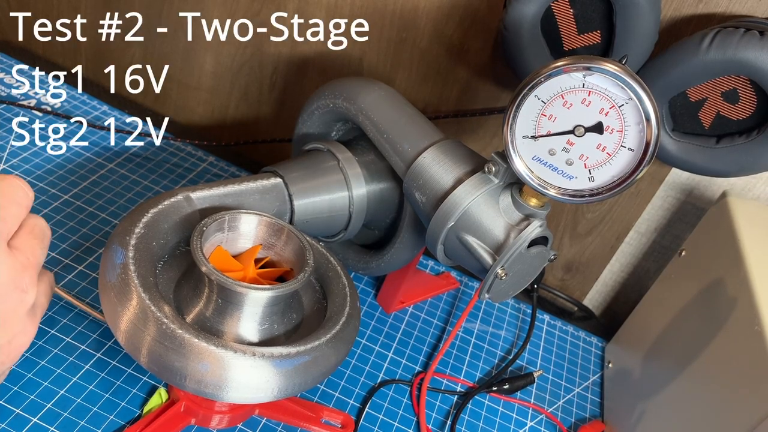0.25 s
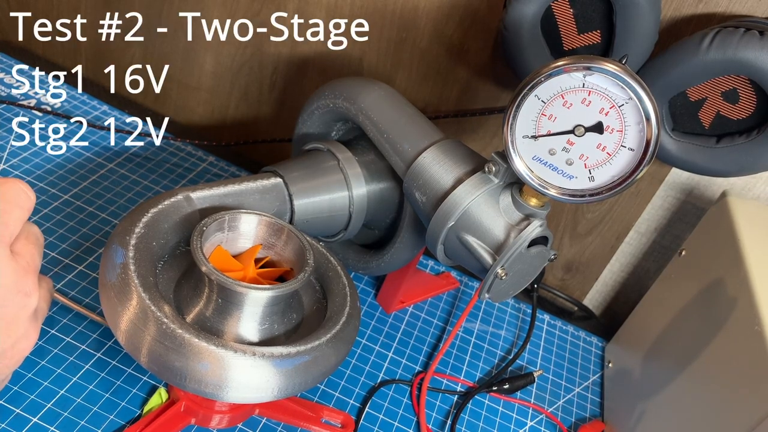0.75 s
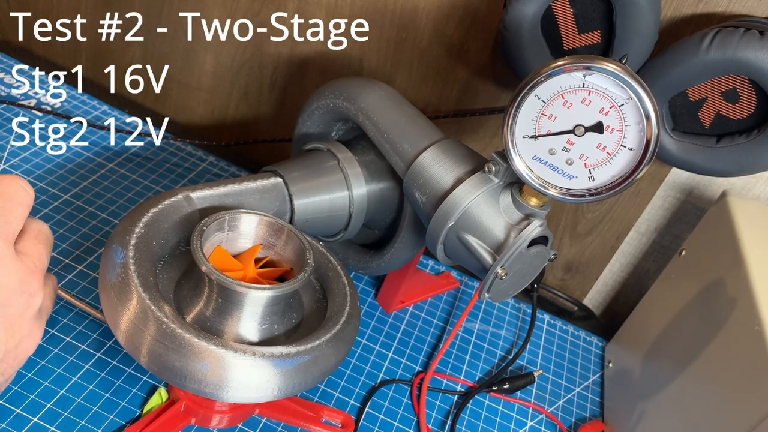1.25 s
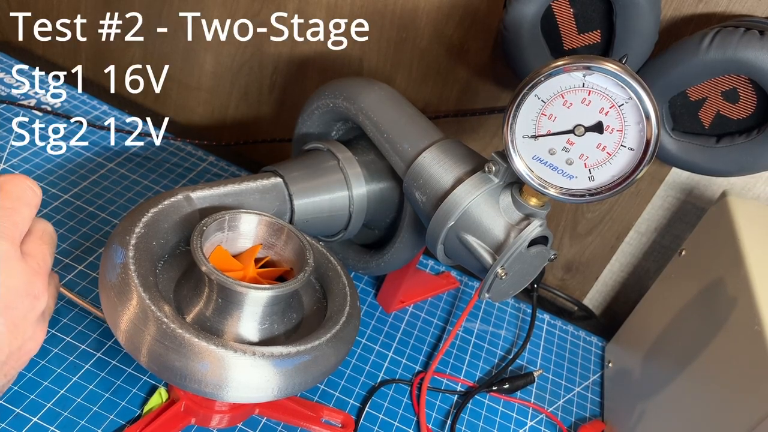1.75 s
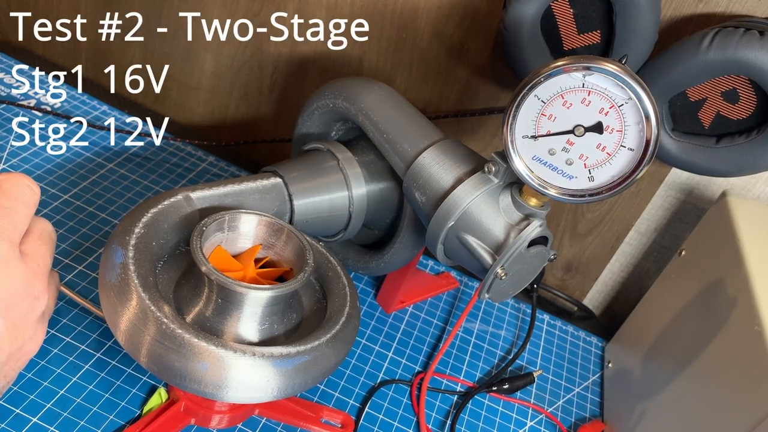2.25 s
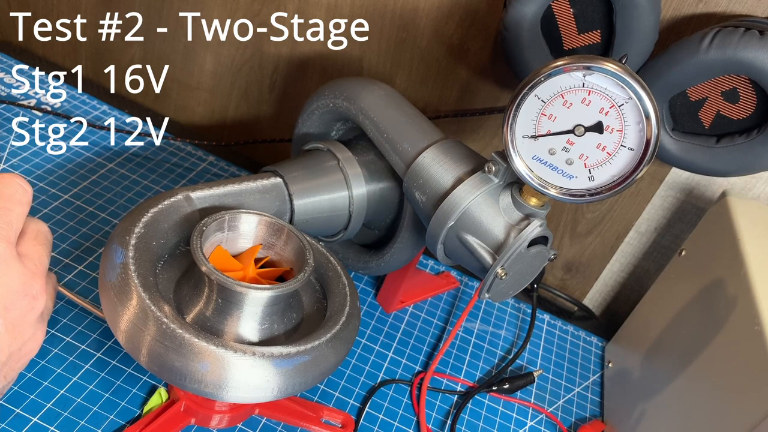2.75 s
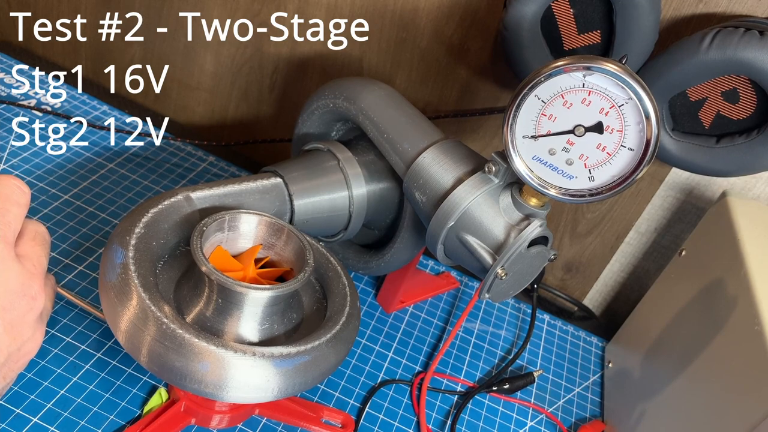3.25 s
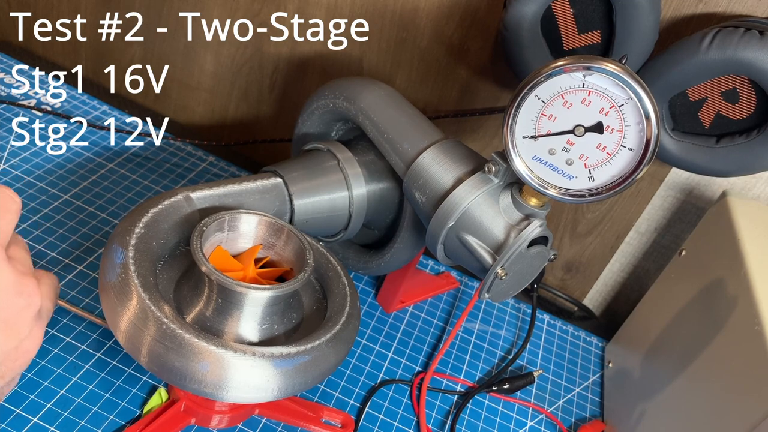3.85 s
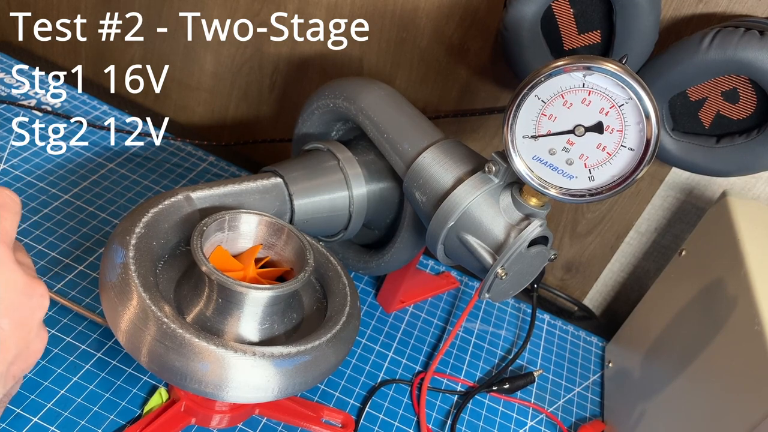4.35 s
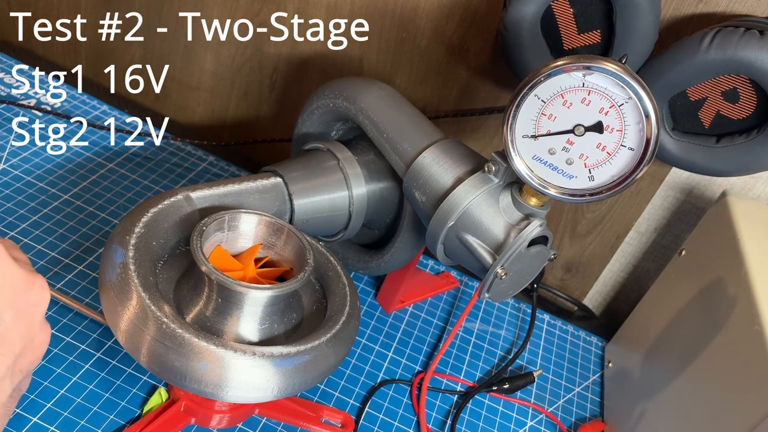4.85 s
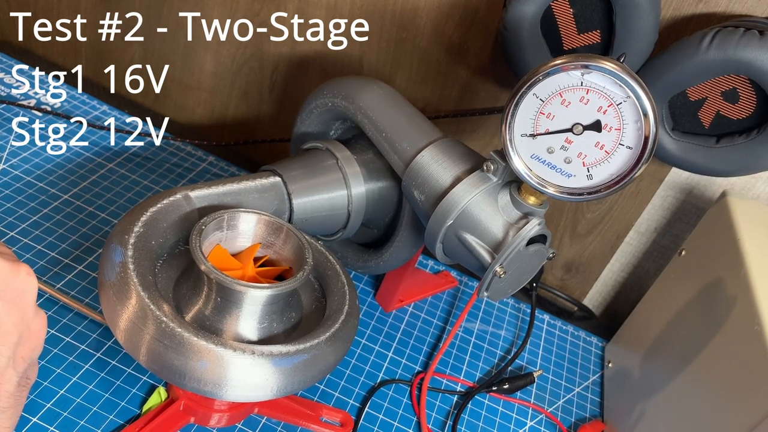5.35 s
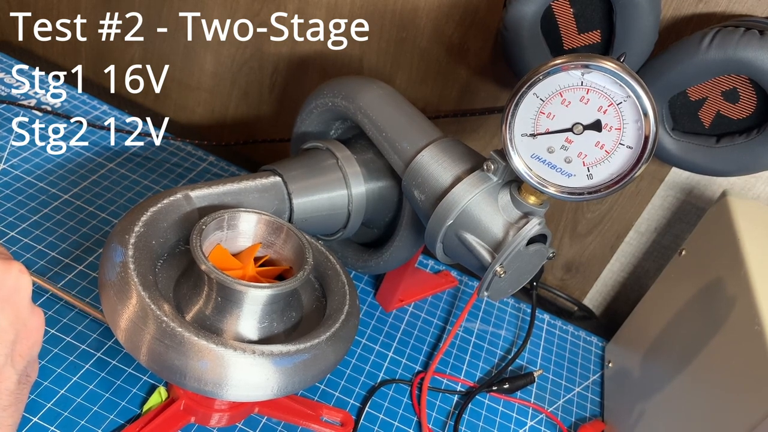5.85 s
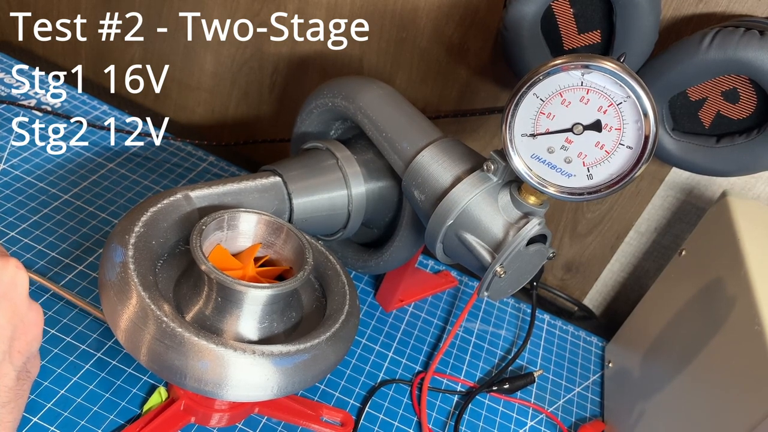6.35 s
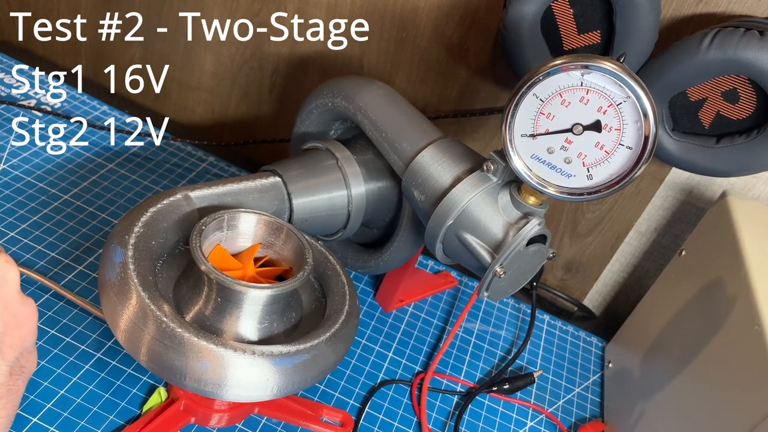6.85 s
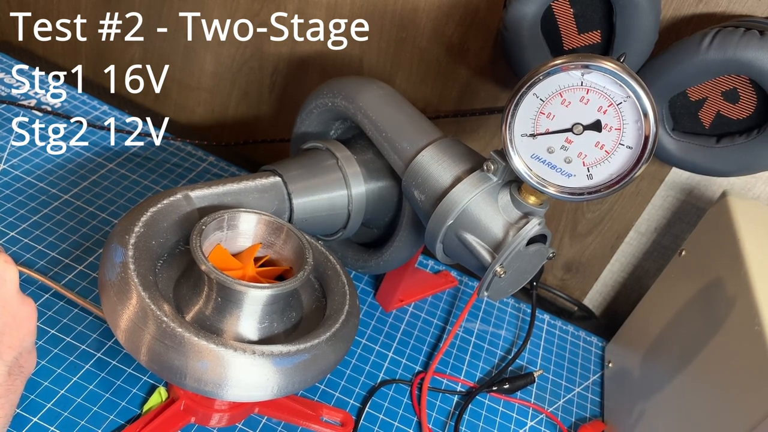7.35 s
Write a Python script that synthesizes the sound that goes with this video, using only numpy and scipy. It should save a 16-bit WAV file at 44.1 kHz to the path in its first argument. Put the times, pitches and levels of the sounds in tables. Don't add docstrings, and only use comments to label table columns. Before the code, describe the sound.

A small motor-driven compressor whines steadily around a high clean pitch over rushing ducted air, with faint rapid bearing ticks, fading in close up.

```python
import sys
import numpy as np
from scipy import signal
from scipy.fft import rfft, irfft
from scipy.io import wavfile
from scipy.ndimage import uniform_filter1d

SR = 44100
rng = np.random.default_rng(int(sys.argv[2]) if len(sys.argv) > 2 else 0)


def transcribe(u):
    v = np.clip(np.atleast_2d(u).T, -1, 1)
    q = np.round(v * 32767).astype(np.int16)
    wavfile.write(sys.argv[1], SR, q)


def convert_level_to_amplitude(level_db):
    exponent = np.asarray(level_db, float) / 20
    return 10 ** exponent


N = 335160

# time in seconds, air level in dB, treble hiss over the air in dB.
AIR_FLOW = [
    (0.0, -42.5, -5.5),
    (5.59, -42.5, -5.5),
    (7.07, -42.5, -4.5),
    (7.6, -42.5, -5),
]
# frequency in Hz, density in dB per Hz.
AIR_COLOUR = [(15, -50), (45, -33), (65, -28), (120, -21), (200, -11), (500, -18), (900, -16), (1300, -17),
              (1700, -22), (3000, -24), (7700, -26), (8100, -21.5), (13300, -27), (15700, -27)]
# frequency in Hz, width in Hz,
# boost in dB (negative for a dip).
DUCT_MODES = [(164.5, 13.2, 8), (180.7, 8.3, 6), (332.3, 61, 14), (419.5, 14, 7.5), (681.6, 78, 12.5),
              (739.6, 63.7, 13.5), (803, 17, 9), (589, 29, -6.5), (1044, 69, 10), (1140, 27, 4),
              (1478, 73, 8.5), (1887, 68, 12), (2243, 40, 9.5), (2410, 82, 4.5), (2990, 25, 9),
              (4200, 500, 3), (5700, 300, 1), (6500, 500, 1.5), (8750, 350, 3), (9800, 900, 2.5),
                 (10950, 300, 5), (13300, 600, -2), (14250, 700, 3)]
# frequency in Hz, level over the air in dB.
SECOND_MOTOR = [(480.5, -10), (2998, -22), (4269, -22)]
# time in seconds, lag in ticks.
CAGE_SLIP = [(0, .86), (.65, .78), (.95, .46), (1.3, .58), (1.75, .54), (2.1, .8), (2.55, 1), (2.95, .76),
             (3.3, .87), (3.9, 1.19), (4.5, 1.1), (5.05, .8), (5.45, 1.02), (5.8, .78), (6.4, .96),
             (7, .67), (7.25, .75), (7.6, .58)]
# time in seconds, peak level in dB.
HARD_BLOWS = [(2.0475, -31), (2.1757, -30), (2.268, -29), (2.4012, -32), (2.5825, -28.5), (2.7948, -27),
              (2.8387, -29), (3.1894, -26.5), (3.6803, -29), (3.8584, -30), (3.904, -29), (4.208, -32),
              (4.252, -30), (4.2959, -28), (4.4655, -31), (4.8551, -31), (5.1589, -30), (5.682, -30),
              (5.9017, -27), (6.0314, -29), (6.2075, -30), (6.5992, -29), (6.6884, -31), (6.7328, -29),
              (7.1245, -33), (7.2545, -28)]
# frequency in Hz, level in dB, decay by 60 dB in seconds.
CASING_MODES = [(4300, -6, .006), (5600, 0, .01), (6400, -5, .006), (7300, -6, .006), (10400, -4, .005),
                (12200, -2, .004), (9600, -5, .004)]
# time in seconds, turns per second.
SHAFT_SPEED = [(0, 318.7), (1, 318.55), (1.6, 318.75), (2.1, 318.42), (3, 318.5), (3.6, 318.25),
               (4.5, 317.87), (5, 318.1), (6.2, 318.12), (6.7, 317.85), (7.3, 318.05), (7.6, 317.9)]
# time in seconds, half length in seconds, rise in dB.
ROCKING = [(1.64, 0.014, 4.5), (2.878, 0.027, -3), (3.866, 0.02, 3), (4.07, .09, 2), (4.294, .035, 2.5),
           (4.533, 0.13, 3), (4.784, 0.075, 3), (4.94, .04, 3), (5.12, .12, 0.5), (5.35, 0.03, 4),
           (5.5, 0.039, 3), (5.65, 0.1, 0.5), (5.992, 0.061, -2.5), (6.183, 0.038, 1.5), (6.6, 0.068, -0.5),
           (6.67, 0.018, -2), (6.768, 0.018, -2)]
# time in seconds, strain from 0 to 1.
ROTOR_STRAIN = [
    (5.07, 0),
    (5.21, 1),
    (5.65, 1),
    (6.18, .55),
    (6.3, .1),
    (7.2, 0),
]
ORDER_LEVELS = [-35, -18, -17.5, -13, -12.5, -17, -15.5, -13.5, -32.5, -30, -28, -23, -15.5, -23, -23.5,
                -33, -33, -34, -24, -32, -29.5, -23.5, -28, -19.5, -28, -19, -16.5, -26.5, -16.5, -21, -26,
                -28.5, -15.5, -22.5, -22, -27, -22, -24, -27.5, -29, -33, -33, -22.5, -23, -30, -25.5,
                -20.5, -33]
# order, drift from start to end in dB, change while warm in dB, under strain in dB.
ORDER_CHANGES = [(3, -1, 6, 14), (4, -5, -1, 10), (6, -6, 1, -9.5), (7, 0, -4, -2), (8, -6, -1, 1),
                 (9, -1, -3.5, -1.5), (10, -9, -4.5, 2.5), (12, -2, 0, 3), (13, 3, -1, 4), (14, -1, -9, 0),
                 (15, 1, -6, 4), (16, 0, -2, 1), (20, 0, 2, -9), (22, -11, -4.5, -4.5), (23, 7, -1.5, 0),
                 (25, 1, -4.5, -1.5), (26, -14, -1, -3), (28, 0, 0, -4.5), (29, -13, 3.5, -6.5),
                 (27, 4, 2.5, -2), (30, 0, 2, -2), (34, 1, -3, 3.5), (35, 3, -4.5, 0), (36, 11, 1, 2),
                 (38, 8, 1.5, 1), (39, -2, -1, 2), (44, 1, -3.5, -9.5), (45, 10, 1, 0), (47, -5, 3.5, 4.5)]
WARMING = [
    2.7,
    3.8,
    5.1,
    6.1,
]
# middle in seconds, rough length in seconds, change at 1-3
# kHz in dB (averaged with the next), change above in dB.
DEEP_GAPS = [(1.062, .027, 1, -25), (2.876, .026, -5, -29), (3.367, .027, -2, -28), (3.834, .024, 2, -31),
             (5.863, .032, 2, -21), (6.835, .03, -24, -19), (7.5, .025, -5, -31)]
# middle in seconds, change at 1-3 kHz in dB (averaged with
SLIGHT_GAPS = [(.151, -5), (.813, -3), (1.007, -3), (1.176, -5), (2.113, -7), (2.287, 1), (2.328, -5),
               (2.563, -11), (2.734, -6), (2.926, -5), (3.077, -3), (3.117, -6), (3.567, -3), (3.927, -5),
               (4.653, -7), (5.271, -4), (5.657, -2), (5.741, -2), (6.06, -11), (6.232, -8), (6.319, -10),
               (6.51, -10), (6.618, -6), (6.766, -3), (6.937, -9), (7.001, -5), (7.427, -1)]

SNAP_HZ, RING_HZ = 14250, 8750


def curves(table):
    s, *columns = np.transpose(table)
    return [np.interp(np.arange(N) / SR, s, column) for column in columns]


def walk(rate):
    hold = int(SR / rate)
    held = np.repeat(rng.standard_normal(N // 100), hold)[:N]
    return 1.38 * uniform_filter1d(uniform_filter1d(held, hold), hold)


def ring(blows, hz, t60):
    pole = np.exp(2j * np.pi * hz / SR - np.log(1000) / (t60 * SR))
    return signal.lfilter([1], [1, -pole], blows).imag


def air(turns, air_db, hiss_db):
    hz = np.fft.rfftfreq(N, 1 / SR) + 1
    colour_hz, colour_db = np.transpose(AIR_COLOUR)
    db = np.interp(np.log(hz), np.log(colour_hz), colour_db)
    for mode_hz, width, boost in DUCT_MODES:
        db += boost / (1 + (2 * (hz - mode_hz) / width) ** 2)
    noise = rfft(rng.standard_normal(N)) * convert_level_to_amplitude(db)
    scale = 1 / np.std(irfft(noise, N))
    treble = 1 / (1 + (3000 / hz) ** 4)
    low = irfft(noise * (1 - treble), N)
    high = irfft(noise * treble, N)
    puff = 1 + .33 * np.cos(2 * np.pi * turns)
    high *= puff * convert_level_to_amplitude(hiss_db + 0.66 * walk(30) + 1.1 * walk(300))
    low *= convert_level_to_amplitude(0.34 * walk(11) + 0.88 * walk(45))
    return scale * convert_level_to_amplitude(air_db + 2.0) * (low + high)


def second_motor(air_db):
    t = np.arange(N) / SR
    drift = np.cumsum(0.00092 * walk(5)) / SR
    out = np.zeros(N)
    for hz, db in SECOND_MOTOR:
        out += convert_level_to_amplitude(db + air_db + 3.3 * walk(18)) * np.sin(2 * np.pi * hz * (t + drift))
    return out


def ticks():
    ticks_per_s, jitter_s = 22.85, .0015
    t = np.arange(N) / SR
    cage_turns = t * ticks_per_s - curves(CAGE_SLIP)[0]
    s = t[1:][np.diff(np.floor(cage_turns)) > 0]
    chance = rng.standard_normal((4, len(s)))
    level_db = np.minimum(-27 + 2.5 * chance[1], -24.5)
    snap_db = -18 + 1.3 * chance[2]
    ring_db = -12.5 + 1.3 * chance[3]
    rows = np.array([s + jitter_s * chance[0], level_db, snap_db, ring_db]).T
    for at, db in HARD_BLOWS:
        k = np.argmin(np.abs(s - at))
        rows[k, :2] = at, db + 6.5
    return rows


def bearing():
    rows = ticks()
    chance = rng.standard_normal((len(rows), 64))
    snap, late, rub = np.zeros((3, N + 200))
    scrape = np.exp(-np.arange(64) / 6) / 3
    for (s, db, snap_db, ring_db), grit in zip(rows, chance):
        i = int(np.clip(s * SR, 0, N))
        snap[i] = convert_level_to_amplitude(db + snap_db)
        late[i + 40] = convert_level_to_amplitude(db + ring_db)
        rub[i + 10:i + 74] = convert_level_to_amplitude(db) * scrape * grit
    out = convert_level_to_amplitude(-7) * ring(ring(snap, SNAP_HZ, .002), SNAP_HZ, .004)
    out += convert_level_to_amplitude(-18.0) * ring(ring(late, RING_HZ, 0.0025), RING_HZ, 0.015)
    for hz, db, t60 in CASING_MODES:
        out += convert_level_to_amplitude(db - 14.5) * ring(rub, hz, t60)
    return out[:N]


def shaft_level():
    t = np.arange(N) / SR
    return -34.5 + sum(db * np.exp(-((t - s) / half) ** 2) for s, half, db in ROCKING)


def whine(turns, tone_db, air_db, strain):
    out = np.sqrt(2) * convert_level_to_amplitude(tone_db + 0.23 * walk(25)) * np.sin(2 * np.pi * turns)
    sample = np.arange(N)
    coarse = sample[::64]
    wander = np.array([walk(rate)[coarse] for rate in (1.5, 2.5, 4., 14., 22., 30.)])
    smeared = turns + 0.0015 * walk(40)
    mix = rng.standard_normal((len(ORDER_LEVELS), 6)) * np.repeat([.35, 1.0], 3)
    start = rng.random(len(ORDER_LEVELS))
    age = np.interp(coarse / SR, WARMING, [-.5, 0, 0, .5])
    warm = np.interp(coarse / SR, WARMING, [0, 1, 1, 0])
    early = np.interp(coarse + .11 * SR, sample, strain)
    changes = {order: dbs for order, *dbs in ORDER_CHANGES}
    for k, order_db in enumerate(ORDER_LEVELS):
        order = k + 2
        drift_db, warm_db, strained_db = changes.get(order, (0, 0, 0))
        rest_db = drift_db * age + warm_db * warm
        load = early if k > 7 else strain[coarse]
        load_db = strained_db + 1.5 + 0.58 * (9 < k < 15)
        flutter_db = min(0.78 + k / 15, 1.1) * mix[k] @ wander
        db = order_db + rest_db + load * (load_db - rest_db) + flutter_db
        gain = np.interp(sample, coarse, np.sqrt(2) * convert_level_to_amplitude(db + air_db[coarse] + 0.28))
        out += gain * np.sin(2 * np.pi * (order * smeared + start[k]))
    return out


def scene():
    air_db, hiss_db = curves(AIR_FLOW)
    turns = np.cumsum(curves(SHAFT_SPEED)[0]) / SR
    strain = curves(ROTOR_STRAIN)[0]
    mix = air(turns, air_db, hiss_db + 5.0) + second_motor(air_db) + bearing()
    mix += whine(turns, shaft_level(), air_db, strain)
    fade = np.interp(np.arange(N) / SR, [-0.13, 2.21], [0, 1])
    return (fade * mix)[None]


def thin_out(x):
    out, hz = x.copy(), np.fft.rfftfreq(4096, 1 / SR)
    slight = [(s, .0155, db, -15) for s, db in SLIGHT_GAPS]
    for s, length, mid_db, top_db in DEEP_GAPS + slight:
        half = int(.9 * length * SR)
        at = np.clip(int((s - .002) * SR) + np.arange(-half, half), 0, N - 1)
        taper = np.interp(top_db, [-30, -15], [.55, 1])
        fade = np.sqrt(signal.windows.tukey(2 * half, taper))
        spectrum = rfft(x[at] * fade, 4096)
        size = np.abs(spectrum) + 1e-12
        around = np.exp(uniform_filter1d(np.log(size), size=200))
        middle_db = (mid_db + top_db) / 2
        loss_db = np.interp(hz, [800, 1100, 2900, 3100], [0, middle_db, middle_db, top_db])
        step_db = np.interp(loss_db, [-30, -11, -5, 0], [18, 17.5, 10, -9]) - 2 * (hz < 7000)
        step = around * convert_level_to_amplitude(step_db)
        rounded = spectrum / size * step * np.round(size / step)
        change = (rounded - spectrum) * (1 - convert_level_to_amplitude(1.6 * loss_db))
        out[at] += fade * irfft(change, 4096)[:2 * half]
    return out


def low_pass(x):
    return signal.sosfilt(signal.butter(12, 16730, fs=SR, output="sos"), x)


def record(dry):
    top_cut = signal.ellip(12, .3, 80, 15730, fs=SR, output="sos")
    mix = signal.sosfilt(top_cut, thin_out(dry[0]))
    return low_pass(mix[None])


dry = scene()
out = record(dry)
transcribe(out)
```